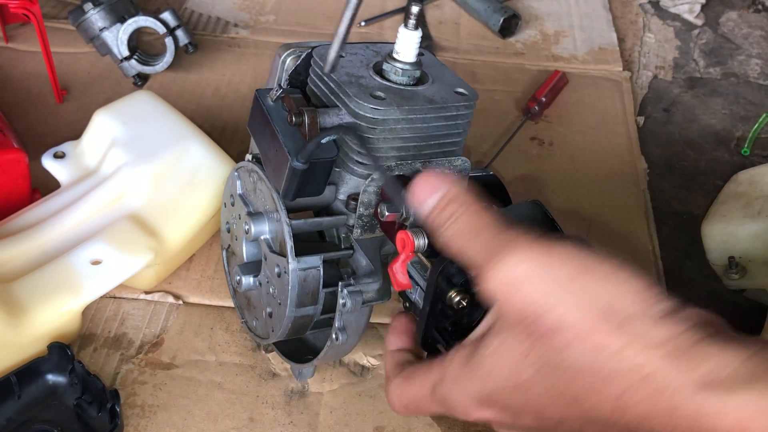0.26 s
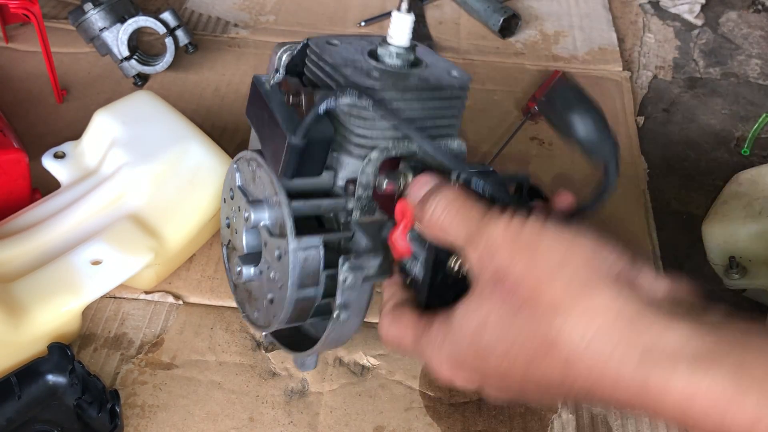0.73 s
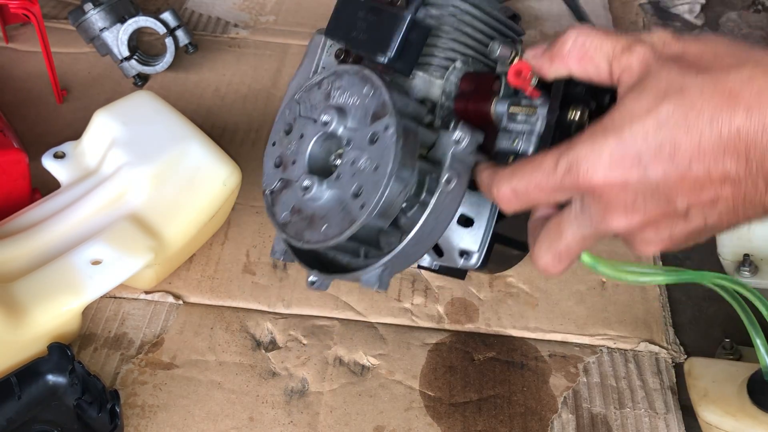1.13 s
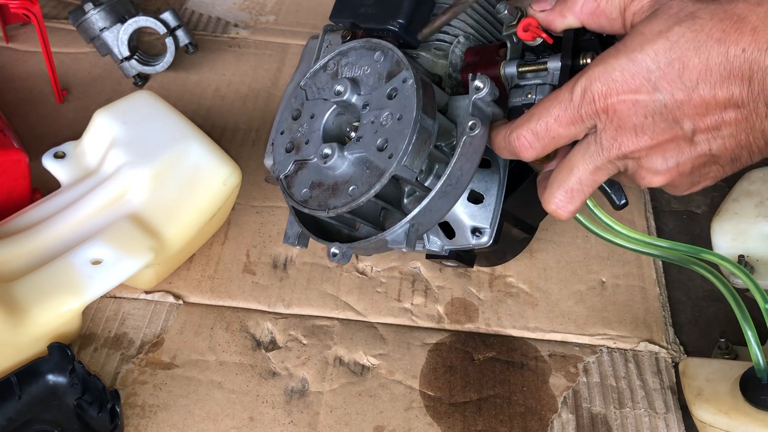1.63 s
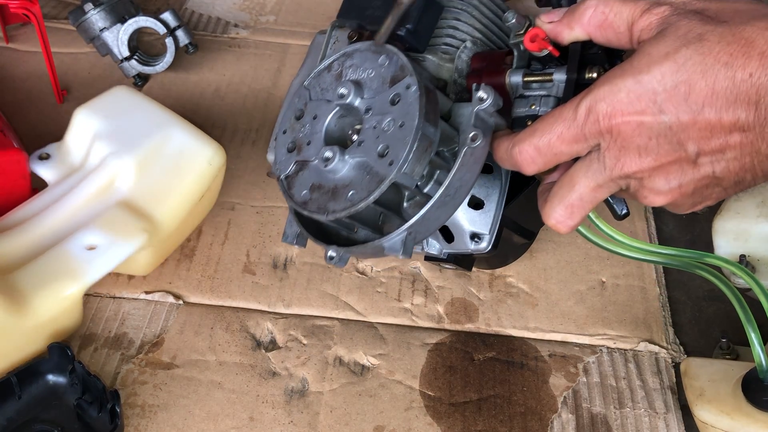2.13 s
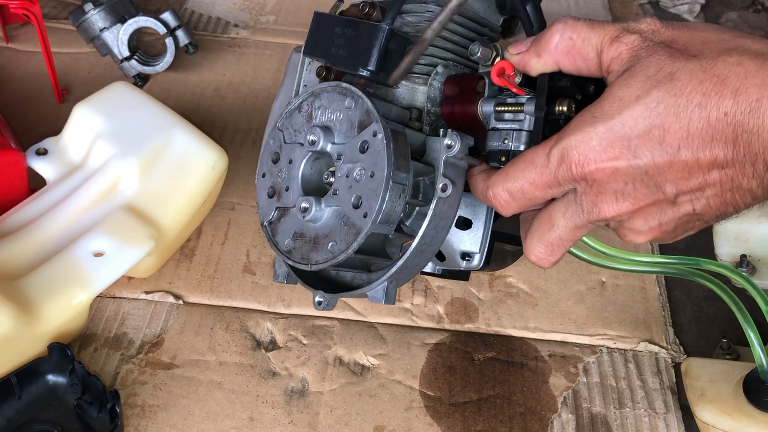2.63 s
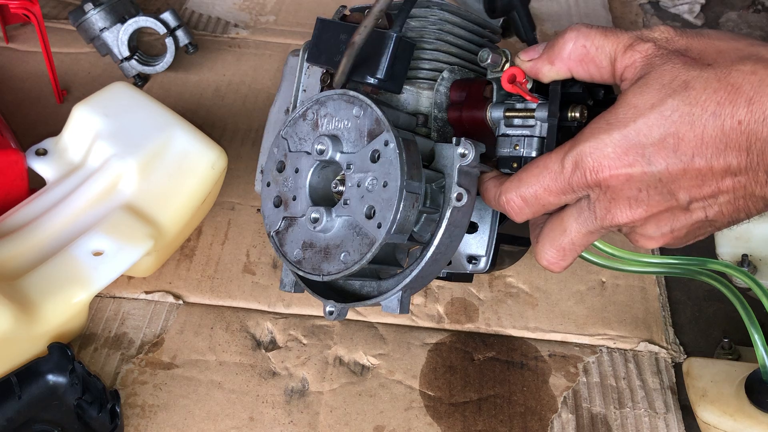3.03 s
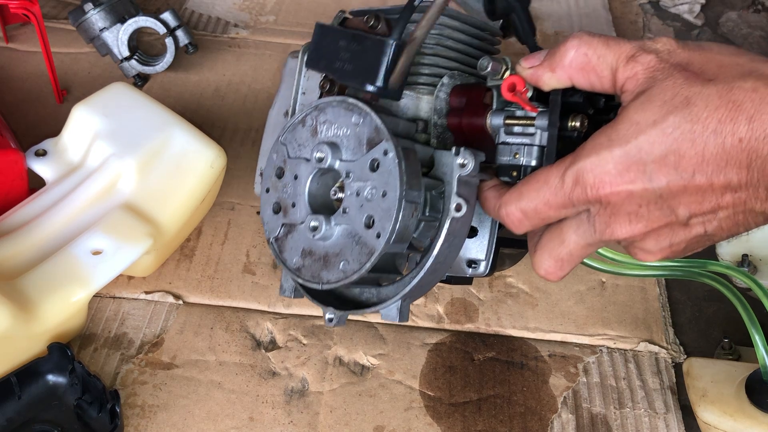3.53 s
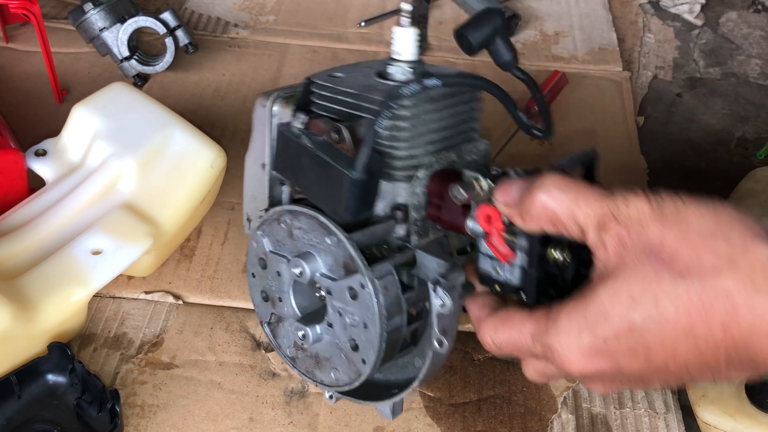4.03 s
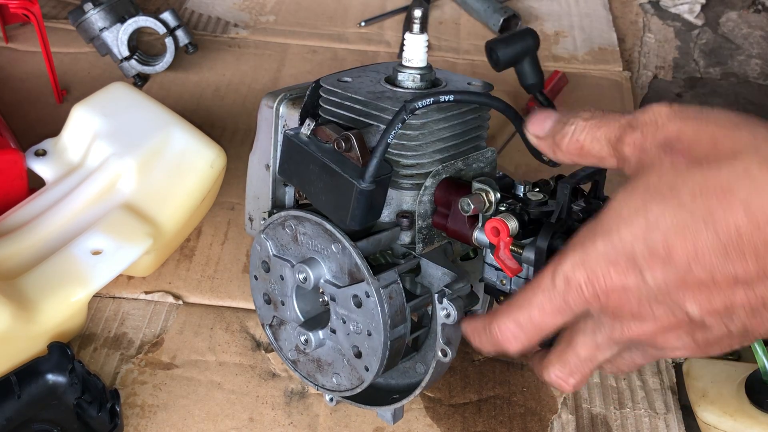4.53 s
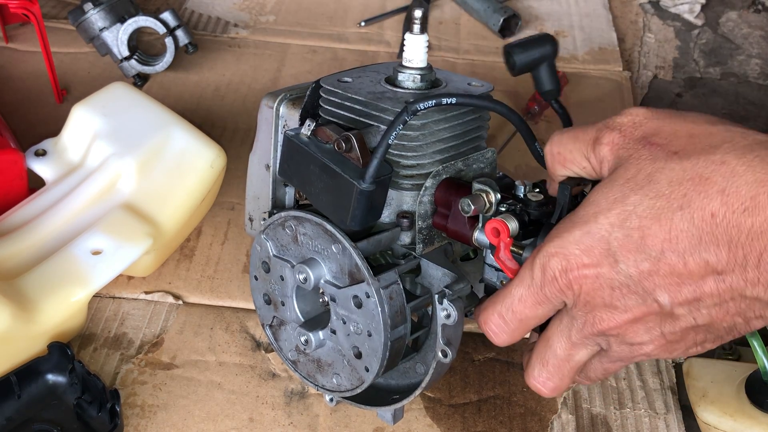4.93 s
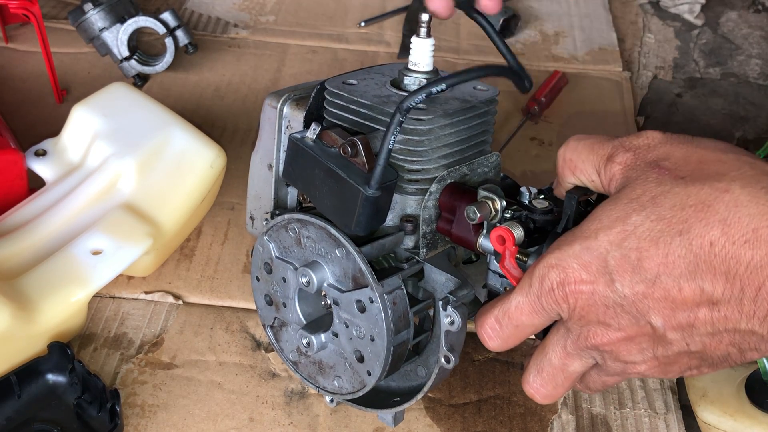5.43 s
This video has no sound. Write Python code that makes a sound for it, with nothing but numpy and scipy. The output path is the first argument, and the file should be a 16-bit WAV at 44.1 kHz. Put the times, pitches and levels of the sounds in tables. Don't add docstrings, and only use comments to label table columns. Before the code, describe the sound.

A close mono microphone in a workshop. First, near quiet with the fading tail of an earlier air burst and very faint taps. Then a blow gun opens abruptly, hissing loudly against a small engine's fins and holes, with airy puffs and two strong gusts hitting the microphone late on. It shuts off sharply with a short room tail; a far engine drone rises and fingers click on the parts.

```python
import sys
import numpy as np
from scipy import signal
from scipy.fft import rfft, irfft, next_fast_len
from scipy.io import wavfile
from scipy.ndimage import uniform_filter1d, map_coordinates

SR = 44100
rng = np.random.default_rng(int(sys.argv[2]) if len(sys.argv) > 2 else 0)


def pcm_store(signal):
    levels = np.round(np.clip(np.atleast_2d(signal), -1, 1) * 32767)
    wavfile.write(sys.argv[1], SR, levels.astype(np.int16).T)


def how_loud(loudness_db):
    steps = np.asarray(loudness_db, float) / 20
    return 10 ** steps


N = 250031

# (opens [s], shuts [s], rise [s], fall [s])
TRIGGER = (1.546, 3.849, .007, .0125)
# (time [s], level [dB], steady part [s], slowing [s], eddy pitch
# [Hz])
GUSTS = [
    (3.221, -22.5, 0.028, .013, 510),
    (3.441, -24.5, 0.012, 0.0032, 620),
    (2.737, -38, .011, 0.014, 450),
    (2.7, -46.5, .01, 0.012, 660),
    (3.485, -45, 0.008, .01, 380),
]
LEAD = 22050


def unit(x):
    return x / np.sqrt(np.mean(x ** 2) + 1e-20)


def along(points, hz):
    f, v = np.transpose(points)
    return np.interp(np.log(hz + 0.0011), np.log(f), v)


def curves(rows):
    s, *cols = np.transpose(rows)
    return [np.interp(np.arange(N) / SR, s, c) for c in cols]


def wobble(rate):
    return map_coordinates(rng.standard_normal(int(N * rate / SR) + 4), [np.arange(N) * rate / SR])


def bump(s, length):
    return np.exp(-(2 * (np.arange(N) / SR - s) / length) ** 2)


def filtered(x, response):
    m = next_fast_len(len(x) + SR // 2)
    return irfft(rfft(x, m) * response(np.fft.rfftfreq(m, 1 / SR)), m)[:len(x)]


def shape(points):
    return lambda hz: how_loud(along(points, hz))


def hollow(modes):
    def response(f):
        total = 0
        for k, (centre, width, db) in enumerate(modes):
            resonance = 1j * f * width / (centre * centre - f * f + 1j * f * width)
            total = total + (-1) ** k * how_loud(db) * resonance
        return total
    return response


def rush(response, patchy_db):
    z = signal.stft(rng.standard_normal(N), nperseg=512)[2]
    field = uniform_filter1d(rng.standard_normal(z.shape), size=6, axis=0)
    field = uniform_filter1d(field, size=8, axis=1)
    patchy = signal.istft(z * how_loud(patchy_db * unit(field)), nperseg=512)[1][:N]
    return unit(filtered(patchy, response))


def valve():
    t = np.arange(N) / SR
    opens, shuts, rise, fall = TRIGGER
    leak = how_loud(-30.5) * np.exp(np.clip(t - opens, None, 0) / 0.0075)
    opening = np.clip((t - opens) / rise, 0, 1) ** 1.4
    closing = np.exp(-np.clip(t - shuts, 0, None) ** 2 / fall ** 2)
    return (leak + opening) * closing


def workshop():
    # (frequency [Hz], level [dB])
    rumble_colour = [(13, -66), (22, -36.5), (40, -15.5), (81, -2.5), (108, -3.5), (134, 0), (236, -19.5),
                     (320, -16.5), (420, -45.5), (700, -120)]
    # (frequency [Hz], level [dB])
    murmur_colours = [
        [(94, -33), (160, -6), (345, -9.5), (380, -5.5), (427, -13.5), (461, -6), (548, -12.5), (760, -10.5), (2660, -24.5), (15900, -43)],
        [(94, -29.5), (160, -5), (194, -11), (291, -14), (326, -12), (435, -15), (639, -13.5), (887, -19), (1670, -14.5), (2110, -22), (2980, -20.5), (3540, -27), (15000, -43), (15900, -44.5)],
    ]
    # (from time [s], rumble level [dB], murmur level [dB], climb [dB/s])
    recovery = [
        (0, -69, -79.5, 9.5),
        (4.15, -67, -64.5, 9.5),
    ]
    duck_db, rumble_follows, roll_db = -8, 0.67, 2.5
    t = np.arange(N) / SR
    after = t > 3
    start, rumble_db, murmur_db, climb = np.array(recovery)[after.astype(int)].T
    climb_until = np.minimum(t, np.where(after, t, TRIGGER[0]))
    risen_db = climb * (climb_until - start).clip(0) + duck_db * valve().clip(0, 1)
    murmur_before = rush(shape(murmur_colours[0]), patchy_db=1.5)
    murmur_after = rush(shape(murmur_colours[1]), patchy_db=1)
    murmur = np.where(after, murmur_after, murmur_before)
    rumble_db = rumble_db + rumble_follows * risen_db + roll_db * wobble(5)
    rumble = how_loud(rumble_db) * rush(shape(rumble_colour), patchy_db=1)
    return rumble + how_loud(murmur_db + risen_db + 2.0) * murmur


def engine():
    # (time [s], firing rate [Hz], level [dB])
    running = [(3.9, 31.3, -56.5), (4.888, 31.29, -51.5), (5.012, 31.92, -51.5), (5.1, 32.15, -48),
               (5.2, 31.95, -51), (5.322, 31.68, -48), (5.446, 32.37, -47), (5.51, 32, -44),
               (5.67, 30.45, -41.5)]
    # (multiple of firing rate, level [dB])
    orders = [(1, -30), (2, -4.5), (3, 0.5), (4, 2), (5, 4), (6, -16), (7, -10.5), (8, -12.5), (9, -15),
              (10, -12.5), (11, -17)]
    hz, db = curves(running)
    turn = 2 * np.pi * np.cumsum(hz) / SR
    tone = np.zeros(N)
    for k, level in orders:
        strength = how_loud(level + 1.5 * wobble(6))
        tone += strength * np.sin(k * turn + .25 * wobble(16) + 0.33 * k ** 2)
    fade_in = np.clip((np.arange(N) / SR - 3.87) / 0.091, 0, 1)
    return how_loud(db - 3.0) * unit(tone) * fade_in


def earlier_burst():
    # (frequency [Hz], level [dB])
    colour = [(500, -30), (2000, -19), (3500, -8), (5000, -8), (5750, 2), (6500, -1), (10000, 3),
              (13000, 2), (15700, 1.5)]
    still_open = np.arange(LEAD) < LEAD - .19 * SR
    return how_loud(-16.5) * rush(shape(colour), patchy_db=0.5)[:LEAD] * still_open


def room(x):
    # (frequency [Hz], time to fall 60 dB [s])
    decay = [(500, 0.91), (2000, .5), (5500, 0.46), (10000, 0.43), (15000, 0.42)]
    # (frequency [Hz], level [dB])
    colour = [(500, -5), (2000, 1), (4000, 1), (5600, 3), (7000, 0), (9000, -3.5), (11500, -2), (15000, -4)]
    hz, t, z = signal.stft(rng.standard_normal(SR), SR, nperseg=256)
    tail_db = along(colour, hz)[:, None] - 60 * t / along(decay, hz)[:, None]
    tail = signal.istft(z * how_loud(tail_db), SR, nperseg=256)[1]
    return signal.fftconvolve(x, tail / np.linalg.norm(tail))[:len(x)]


def ticks():
    # (time [s], peak level [dB], ring pitch [Hz], snap level [dB], knock level [dB])
    taps = [
        (0.3144, -67, 4120, -16, -13),
        (0.7944, -63, 5470, -10, -9),
        (1.0778, -51.5, 4160, -7.5, -21),
        (4.7517, -33.5, 4000, -9.5, -5.5),
        (4.7703, -39.5, 2970, -23.5, -11),
        (4.897, -40, 3350, -22.5, -15),
        (4.9114, -43.5, 2530, -16, -8),
        (4.933, -46.5, 2880, -25, -7),
    ]
    # (multiple of ring pitch, level [dB])
    crack = [(.3, -26), (.55, -5), (1, 0), (1.4, -4), (2.2, -9), (3.5, -30)]
    out, t = np.zeros(N), np.arange(SR // 20) / SR
    for s, db, hz, snap_db, body_db in taps:
        rough = unit(filtered(rng.standard_normal(len(t)), lambda f: how_loud(along(crack, f / hz))))
        ring = how_loud(-60 * t / 0.012) * (0.78 * rough + .25 * np.sin(2 * np.pi * hz * t))
        snap = how_loud(snap_db + 6 - 60 * t / .011) * rng.standard_normal(len(t))
        body = np.sin(2 * np.pi * 1600 * t)
        body += 1.5 * np.sin(2 * np.pi * 330 * t)
        body += 0.64 * np.sin(2 * np.pi * 900 * t)
        knock = how_loud(body_db - 3 - 60 * t / 0.024) * body
        out[round(s * SR):][:len(t)] += how_loud(db - 1.0) * (ring + snap + knock)
    return out


def rubs():
    # (time [s], length [s], level [dB])
    strokes = [
        (.78, 0.067, -77),
        (0.935, .11, -76.5),
        (4.903, .06, -64),
        (5.221, .06, -65),
    ]
    # (frequency [Hz], level [dB])
    colour = [(1500, -40), (3000, 2), (5500, -1), (9000, -12), (15500, -18)]
    grain = unit(how_loud(3 * wobble(220)) * rush(shape(colour), patchy_db=1))
    swell = np.zeros(N)
    for s, length, db in strokes:
        progress = np.clip((np.arange(N) / SR - s) / length, 0, 1)
        swell += how_loud(db) * np.sin(np.pi * progress)
    return swell * grain


def puffs():
    # (time [s], level [dB], length [s])
    weak_puffs = [(1.633, -44.5, 0.093), (1.74, -46, .07), (1.824, -48, .04), (2.28, -53, .06),
                  (2.38, -57, 0.057), (2.507, -51, 0.046), (2.61, -48, 0.079), (2.765, -45, .025),
                  (2.98, -50, 0.08), (3.255, -37, .04), (3.46, -38, .03), (3.608, -49.5, 0.036),
                  (3.72, -44.5, 0.05)]
    colour = [(20, -24), (60, -4.5), (130, -6), (300, -7), (700, -29.0)]  # (frequency [Hz], level [dB])
    lumps = unit(how_loud(2.4 * wobble(45)) * rush(shape(colour), patchy_db=2.0))
    strength = how_loud(-62.5)
    for s, db, length in weak_puffs:
        strength = strength + how_loud(db) * bump(s, length)
    return valve() * strength * lumps


def gusts():
    # (multiple of eddy pitch, level [dB])
    eddy_colour = [(.08, -41), (.2, -17), (.5, -1.5), (1, 0.5), (1.5, -9), (2.2, -4), (3.2, -10),
                   (5, -27.5), (9, -67)]
    last_vortex_per_s = 45
    air, t = np.zeros(N), np.arange(SR // 8) / SR
    for s, db, steady, slowing, hz in GUSTS:
        eddies = unit(filtered(rng.standard_normal(SR // 4), lambda f: how_loud(along(eddy_colour, f / hz))))
        eddies /= np.std(eddies[2000:][:round(steady * SR)])
        late = np.clip(t - steady, 0, None)
        speed = 0.11 + .9 * np.exp(-late / (.55 * slowing))
        travelled = np.cumsum(speed)
        strength = np.clip(t / 0.0027, 0, 1) * np.exp(-(late / (1.6 * slowing)) ** 1.8)
        regular = np.exp(-((t - .0075) / 0.0029) ** 2)
        regular += last_vortex_per_s * slowing * (1 - np.exp(-late / 0.0024))
        vortex = 1.6 * regular * np.sin(2 * np.pi * hz * travelled / SR)
        slowed_eddies = speed ** 0.45 * map_coordinates(eddies, [2000 + travelled])
        air[round(s * SR):][:len(t)] += how_loud(db) * strength * (slowed_eddies + vortex)
    return air


def cavities(modes, aim_hz, reach_hz, patchy_db):
    song = np.zeros(N)
    for hz, width, db in modes:
        struck = 0.36 + np.exp(-((hz - aim_hz) / reach_hz) ** 2)
        song += how_loud(db) * struck * rush(hollow([(hz, width, 0)]), patchy_db)
    return song / np.std(song[valve() > .5])


def jet():
    # (time [s], level [dB])
    wander = [(1.56, -21), (1.86, -19.5), (2.0, -22), (2.2, -25.5), (2.25, -21), (2.6, -20), (3.0, -21.5),
              (3.75, -20.5), (3.85, -20)]
    # (time [s], length [s], change [dB])
    swerves = [(1.59, .03, -2), (1.74, .03, -1.5), (1.965, .03, -3), (2.31, .03, -1), (2.41, .03, -2),
               (2.535, .03, -2), (2.755, .02, -3), (3.205, .02, -2), (3.275, .04, -2), (3.465, .015, -3),
               (3.483, .012, 4), (3.505, .02, -2), (3.62, .03, -2)]
    # (time [s], length [s], fin gaps change [dB], holes change [dB])
    crossings = [(1.553, 0.023, 1.5, 4), (1.67, .18, 1.5, 0), (1.79, .08, 2.5, 3.5), (1.93, .06, 5, 2),
                 (2.02, 0.11, 0, 2.5), (2.25, .08, 3, 5), (2.325, .03, 6, 0), (2.44, .08, 8.5, 4),
                 (2.596, 0.24, -1.5, 5), (2.775, .04, 5, 4), (2.95, .3, -1.5, 3), (3.162, 0.22, 3, -3.5),
                 (3.33, .2, 1, -4), (3.49, .04, -1, 5), (3.527, .05, 3, 2), (3.58, .07, -1.5, 9),
                 (3.648, .06, 3, -2.5), (3.786, 0.18, 5, 6)]
    # (time [s], favoured fin gap [Hz], favoured hole [Hz])
    aim = [(1.55, 5100, 9750), (1.74, 5350, 9900), (1.78, 4600, 9800), (2.24, 4800, 10150),
           (2.45, 4850, 9500), (2.9, 4800, 9000), (3.25, 4750, 9300), (3.5, 4800, 8950), (3.85, 4300, 9000)]
    # (frequency [Hz], level [dB])
    shear = [(3000, -38.5), (6000, -7), (8000, -5), (10300, -7), (11500, -2.5), (13000, 0.5), (14800, 3.5),
             (15400, 2.5), (15750, -1)]
    # (frequency [Hz], level [dB])
    face_colour = [(150, -39), (400, -15.5), (1000, -10.5), (1500, -9), (2000, -1.5), (2800, -3.5),
                   (3500, 0), (6000, -30.5)]
    # (pitch [Hz], width [Hz], level [dB])
    fin_gaps = [(3772, 460, 3.5), (4440, 590, -4), (4900, 350, -1.5), (5470, 220, 0), (7100, 400, -1)]
    # (pitch [Hz], width [Hz], level [dB])
    holes = [(8884, 320, -1.5), (9750, 220, -8), (10290, 470, 0.5)]
    resting_fins_db, resting_holes_db, resting_faces_db = -9, -8, -14
    faces_follow, spill = 0.42, .3
    deeper_hz_per_db = -30
    spray_db = 30

    jet_db = curves(wander)[0]
    for s, length, db in swerves:
        jet_db = jet_db + db * bump(s, length)
    fins_db, holes_db = sum(np.outer(db, bump(s, length)) for s, length, *db in crossings)
    gap_hz, hole_hz = curves(aim)
    faces_db = -22 + faces_follow * (jet_db + 22) + resting_faces_db + spill * fins_db
    for s, db, steady, *_ in GUSTS:
        faces_db += max(db + spray_db, 0) * bump(s + steady * .7, steady * 1.3)

    free = how_loud(jet_db + 3.0) * rush(shape(shear), patchy_db=1.83)
    gap_hz = gap_hz + deeper_hz_per_db * fins_db
    gap_song = cavities(fin_gaps, gap_hz, reach_hz=454, patchy_db=1.6)
    hole_song = cavities(holes, hole_hz, reach_hz=598, patchy_db=1.7)
    hiss = free + how_loud(jet_db + resting_fins_db + fins_db) * gap_song
    hiss += how_loud(jet_db + resting_holes_db + holes_db) * hole_song
    hiss += how_loud(faces_db + 2.0) * rush(shape(face_colour), patchy_db=1.53)
    flutter_db = .8 * wobble(35) + 0.99 * wobble(260)
    return valve() * hiss * how_loud(flutter_db)


def scene():
    near = jet() + ticks() + rubs()
    tail = how_loud(-15.5) * room(np.concatenate([earlier_burst(), near]))[LEAD:]
    mono = near + tail + puffs() + gusts() + engine() + workshop()
    return np.array([mono, mono])


def low_pass(x):
    return signal.sosfilt(signal.butter(12, 16950, fs=SR, output="sos"), x)


def record(dry):
    # (frequency [Hz], level [dB])
    bass_cut = [(15, -35), (35, -6.5), (60, 0)]
    top_hz, edge_hz = 15810, 100

    def response(hz):
        edge = np.sin(np.pi / 2 * np.clip((top_hz - hz) / edge_hz, 0, 1)) ** 2
        return how_loud(along(bass_cut, hz)) * edge

    self_noise = how_loud(-90.0) * rng.standard_normal(N)
    mono = filtered(dry[0] + self_noise, response)
    return low_pass(np.array([mono, mono]))


dry = scene()
out = record(dry)
pcm_store(out)
```